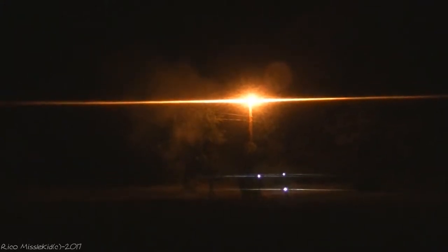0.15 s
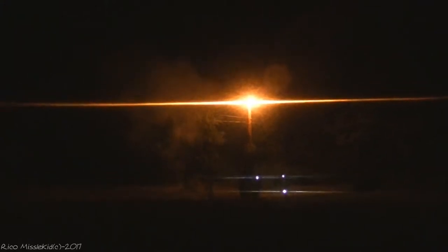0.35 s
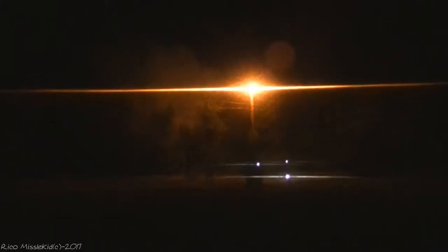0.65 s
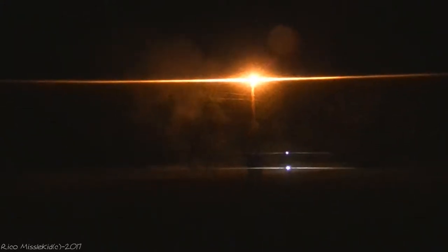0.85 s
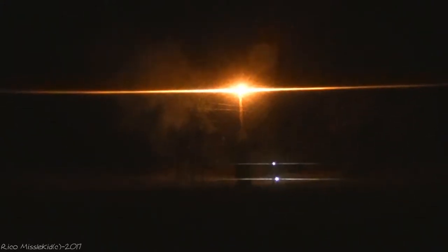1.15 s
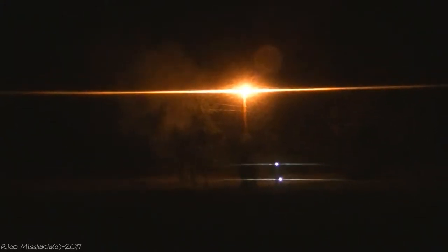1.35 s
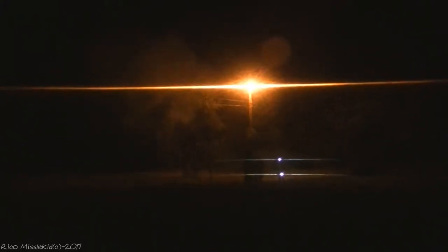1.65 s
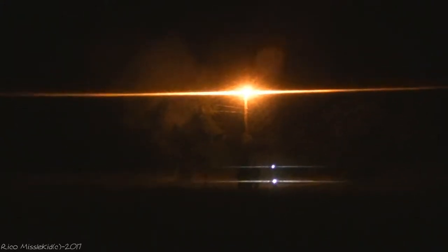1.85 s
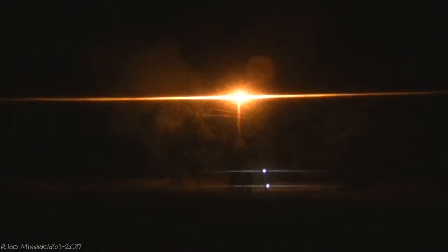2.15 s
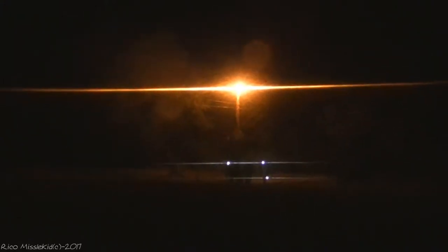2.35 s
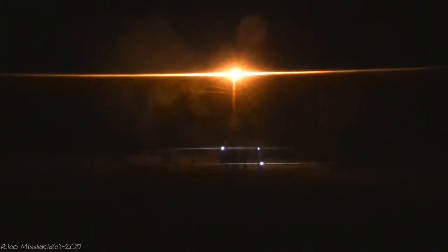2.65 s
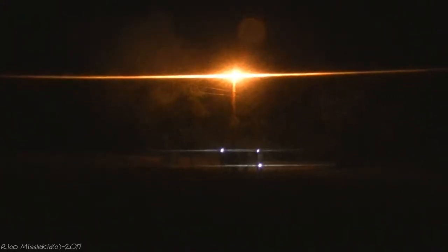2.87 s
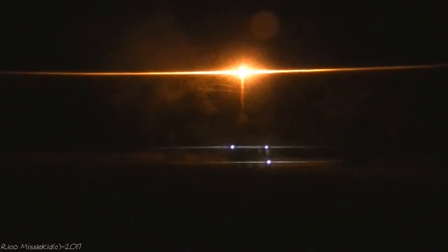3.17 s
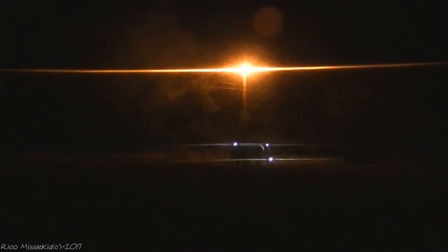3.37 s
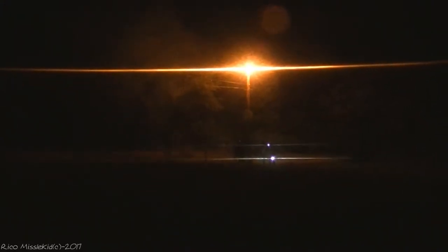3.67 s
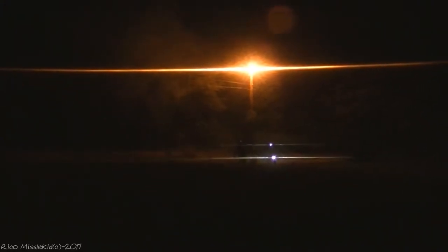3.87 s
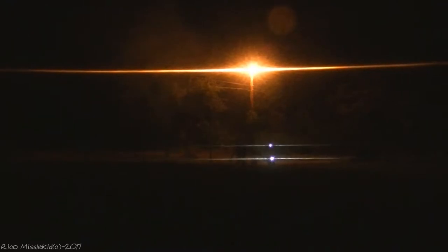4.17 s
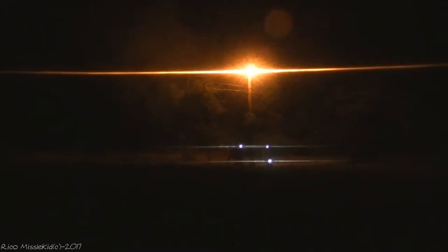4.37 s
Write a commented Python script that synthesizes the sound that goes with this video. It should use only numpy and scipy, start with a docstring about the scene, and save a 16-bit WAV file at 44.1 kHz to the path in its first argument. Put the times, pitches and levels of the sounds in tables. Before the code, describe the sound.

A steady wall of katydids and crickets in a dark open field, heard by a stationary stereo microphone. Short raspy strokes, about eight a second within each phrase, rise slightly from a midrange-to-high wash of distant insects. Pure cricket pulses never stop. Small dry clicks come near one and two seconds, a faint brief whistle later, and soft low murmur stays far below. Leaves and trunks add only slight diffuse echo.

```python
"""A field at night, full of insects. Near katydids rasp in phrases of up to three strokes: runs of tooth
catches ring a husky wing, mixed with a clearer, buzzing note. Many more blur into a wash of patchy noise from
the trees. Crickets trill without a break as pulsed pure tones, with a very faint fluttering whine above them.
Short whistles come from far off, a few dry puffs of noise tick close by, and filtered noise rumbles beneath."""
import sys
import numpy as np
from scipy import signal
from scipy.fft import rfft, irfft, next_fast_len
from scipy.io import wavfile
from scipy.ndimage import uniform_filter1d, map_coordinates

SR = 44100
rng = np.random.default_rng(int(sys.argv[2]) if len(sys.argv) > 2 else 0)


def output_pcm(signal):
    """Save a mono or channel-first signal as 16-bit PCM at the path in sys.argv[1].

    Samples are clipped to [-1, 1] before scaling.
    """
    pcm = np.clip(np.atleast_2d(signal).T, -1, 1) * 32767
    wavfile.write(sys.argv[1], SR, np.round(pcm).astype(np.int16))


N = 199053

# Phrases of the near katydids. Each row: middle of the first stroke in seconds, number of strokes,
# level in dB before stroke scatter, arch and voice trims, share of the clear ringing voice from 0 to 1.
KATYDID_PHRASES = [(.015, 2, -39.5, .35), (.395, 3, -39, .4), (.85, 2, -38.5, 0.14), (1.165, 3, -40, 0.18),
                   (1.648, 3, -37.5, 0.16), (1.96, 2, -46.5, 0.2), (2.382, 3, -40, 0.4),
                   (3.15, 3, -39, 0.66), (3.81, 1, -39, .5), (3.965, 3, -39, 0.9), (4.385, 2, -45, .2)]
# Wing resonances of the husky voice. Each row: pitch in Hz, half width in Hz, level in dB.
HUSKY_RESONANCES = [(4570, 160, 2.5), (4905, 140, -1.5), (5210, 99, -0.5), (5880, 98, -4)]
# Echo of the trees. Each row: frequency in Hz, time to decay by 60 dB in seconds.
TREE_ECHO = [(500, 0.1), (4000, 0.25), (10000, 0.072)]
# Kinds of trilling cricket. Each row: middle pitch in Hz, pitch spread in Hz per unit of place in the group,
# typical wing strokes per second, level in dB, lean to the left in dB.
CRICKET_KINDS = [(2159, 115, 42, -58, 1), (3035, 105, 42, -46, 2), (3879, 82, 45, -43.5, 1.5),
                 (7025, 125, 70, -50.5, -1)]
# Tone of the far tree line. Each row: frequency in Hz, relative level in dB.
FAR_SPECTRUM = [(1200, -32), (1650, -20), (1950, -3), (2200, -2), (2450, -0.5), (2800, 5), (3150, 6),
                (3500, 5), (4100, -29), (4600, -29), (5600, -35), (7500, -48), (9000, -80)]
# Tone of the nearer trees. Each row: frequency in Hz, relative level in dB.
TREES_SPECTRUM = [(2500, -44), (3700, -1), (4300, 1.5), (4800, 2.5), (5200, 1), (5800, -3.5), (6200, -12),
                  (6600, -8), (7000, -15), (7300, -17.5), (7650, -24.5), (9000, -57)]
# Tone of the high fizz. Each row: frequency in Hz, relative level in dB.
FIZZ_SPECTRUM = [(5000, -27), (7500, 1.5), (9200, 2.5), (11000, 1.5), (13000, -2), (15500, -9.5)]
# Brief lulls of the nearer trees: the middle of each in seconds.
LULL_TIMES = [1.51, 2.23, 3.205, 4.25]
# Course of the distant rumble. Each row: time in seconds, level in dB before an overall lift.
RUMBLE_LEVEL = [(0.1, -69.5), (0.17, -71.5), (1.57, -68), (1.94, -72.5), (2.43, -73), (2.47, -69.5),
                (2.74, -70.5), (4.07, -73.5), (4.45, -70)]
# Tone of the rumble. Each row: frequency in Hz, relative level in dB.
RUMBLE_SPECTRUM = [(20, -2.5), (60, -3.5), (130, -5.5), (190, -3), (255, -1), (350, -1.5), (500, -0.5),
                   (750, -1), (950, 0.5), (1200, -2.5), (1600, 3), (3000, -37), (6000, -66)]
# Tone of the low drone. Each row: frequency in Hz, relative level in dB.
DRONE_SPECTRUM = [(170, -26), (245, 1.5), (340, 0), (480, -5.5), (650, -33)]
# Faint far whistles. Each row: middle in seconds, pitch there in Hz, glide in Hz per second, level in dB.
FAR_CALLS = [(.09, 913, -100, -74), (1.519, 983, -700, -73), (3.13, 361, 247, -76), (3.46, 2365, 0, -50.5),
             (3.46, 2670, -3, -52), (3.44, 2140, -200, -57), (4.29, 880, -750, -72.5)]
# Dry ticks and soft rustles close by. Each row: middle in seconds, level in dB, pitch in Hz,
# half length in seconds.
CLOSE_TICKS = [(1.083, -42.5, 9300, .0012), (1.1925, -52, 8460, .001), (1.199, -50, 8340, .0012),
               (2.15, -60, 8800, 0.02), (2.1654, -32.5, 6800, 0.0017), (2.1658, -51, 9650, .0013),
               (2.188, -56, 8300, .015)]

STROKE_PERIOD_S, HALF_STROKE_S = 0.12, .027  # from one wing stroke to the next; half the length of one
STROKE_SCATTER_DB, ARCH_DB = 0.7, 2  # strokes differ at random; the outer strokes of a phrase are softer
FAR_DB, FAR_SWAY_DB = -44, 1.0  # the far tree line, and how much its level sways
TREES_DB, TREES_SWAY_DB = -39.5, 0.48  # the same for the nearer trees
SWAY_PER_S = 26  # random sway points per second: the mass drifts in and out of step
ANSWER_DB = 0.5  # the far ones join in with the strokes of the near ones
LULL_DB, HALF_LULL_S = 3.5, 0.028  # depth of the lulls and half their length
FIZZ_DB, FIZZ_SWAY_DB = -65.5, 0.37  # the faint high fizz of the chorus
DRONE_DB, DRONE_EXTRA_DB, DRONE_FADE_S = -74.5, 9.5, .9  # the drone starts louder and settles
TOP_HZ = 15750  # upper limit of the whole sound


def amp(db):
    """Decibels to gain."""
    return 10 ** (np.asarray(db) / 20)


def unit(x):
    """Scale to rms 1."""
    return x / np.sqrt(np.mean(x ** 2) + 1e-20)


def along(points, hz):
    """Read (Hz, value) points along a log frequency axis."""
    f, v = np.transpose(points)
    return np.interp(np.log(hz + 1), np.log(f + 1), v)


def clock():
    """The time of every sample in seconds."""
    return np.arange(N) / SR


def curve(rows):
    """Draw straight lines through (seconds, value) points, one value per sample."""
    s, value = np.transpose(rows)
    return np.interp(clock(), s, value)


def wobble(rate):
    """A smooth random curve with rate knots a second."""
    at = np.arange(0, N + 16, 16)  # every 16th sample is enough
    smooth = map_coordinates(rng.standard_normal(2500), [at * rate / SR], mode="mirror")
    return np.interp(np.arange(N), at, smooth)


def filtered(x, response):
    """Shape x by a complex response of frequency."""
    m = next_fast_len(N + SR // 2)
    spectrum = rfft(x, m) * response(np.fft.rfftfreq(m, 1 / SR))
    return irfft(spectrum, m)[..., :N]


def resonance(f, hz, width):
    """A causal resonance with steep skirts: two equal resonators in a row."""
    return (1j * f * width / (hz * hz - f * f + 1j * f * width)) ** 2


def pan(x, left_db):
    """Lean a sound to the left, or to the right if negative."""
    return x * amp([[left_db / 2], [-left_db / 2]])


def rush(spectrum, side_db, patchy_db):
    """Stereo noise of rms 1 that swells in short random patches of time and pitch."""
    z = signal.stft(rng.standard_normal((2, N)), nperseg=256)[2]
    patches = uniform_filter1d(rng.standard_normal(z.shape[1:]), 6, 0)
    patches = uniform_filter1d(patches, 18, 1)
    pair = signal.istft(z * amp(patchy_db * unit(patches)), nperseg=256)[1][:, :N]
    mid, side = filtered(pair, lambda hz: amp(along(spectrum, hz))) * amp([[0], [side_db]])
    return unit(np.array([mid + side, mid - side]))


def outdoors(x, wet_db, side_db):
    """Add the scatter from leaves and trunks, a noise tail whose decay depends on pitch, at about equal power."""
    hz, t, z = signal.stft(rng.standard_normal((2, SR // 2)), SR, nperseg=256)
    decay = amp(-60 * t / along(TREE_ECHO, hz)[:, None])
    tail = signal.istft(z * decay, SR, nperseg=256)[1]
    scatter = signal.fftconvolve(x[None], tail / np.linalg.norm(tail[0]), axes=1)[:, :N]
    mid, side = scatter * amp([[wet_db], [wet_db + side_db]])
    return np.array([x + mid + side, x + mid - side]) / np.sqrt(1 + amp(2 * wet_db))


def phrasing():
    """Power of the husky and the clear voice: evenly spaced wing strokes that swell and fade."""
    t, power = clock(), np.zeros((2, N))
    for s, strokes, db, clear in KATYDID_PHRASES:
        scatter_db = STROKE_SCATTER_DB * rng.standard_normal(size=8)
        share = np.clip(clear, 0, 1)
        for k in range(round(strokes)):
            swell = np.exp(-np.abs((t - s - k * STROKE_PERIOD_S) / HALF_STROKE_S) ** 3)
            arch_db = ARCH_DB * (k - (round(strokes) - 1) / 2) ** 2
            stroke_power = amp(db + scatter_db[k] - arch_db) ** 2 * swell
            power += np.outer([1 - share, share], stroke_power)
    return power


def scrape(wing, tooth_rate, scatter, size_db):
    """The scraper catches the teeth of the file one by one; each catch rings the wing."""
    chance = rng.standard_normal((4000, 2))
    gaps = np.exp(scatter * chance[:, 0])
    at = np.round(np.cumsum(gaps) * SR / tooth_rate).astype(int)
    catches = np.bincount(at[at < N], amp(size_db * chance[at < N, 1]), N)

    def ring(f):
        # neighbouring resonances take opposite signs
        return sum((-1) ** k * amp(db) * resonance(f, hz, 2 * half_width)
                   for k, (hz, half_width, db) in enumerate(wing))
    return unit(filtered(catches, ring))


def ringing_wing(hz=5275, tooth_rate=215, depth=0.53, waver=0.011):
    """A sharply tuned wing keeps ringing from tooth to tooth: a buzzing, nearly pure note."""
    teeth = np.cumsum(tooth_rate * (1 + 0.1585 * wobble(60))) / SR
    pitch = hz * (1 + waver * wobble(35) + waver * wobble(400))
    buzz = (1 + depth * np.cos(2 * np.pi * teeth)) * amp(1.0 * wobble(140))
    return unit(buzz * np.sin(2 * np.pi * np.cumsum(pitch) / SR))


def katydids(power, husky_db=-0.1, clear_db=-1.0):
    """Each wing stroke swells and fades, mixing husky tooth catches with the clear ringing wing."""
    rasp = scrape(HUSKY_RESONANCES, tooth_rate=400, scatter=.25, size_db=1.0)
    husky = amp(husky_db) * np.sqrt(power[0]) * rasp
    ringing = amp(clear_db) * np.sqrt(power[1]) * ringing_wing()
    return pan(outdoors(husky + ringing, wet_db=-14, side_db=-6), left_db=.4)


def trill(hz, stroke_rate, sag=.03, drift=.011, swell_db=1.0):
    """One cricket: a pure pulse for every closing of the wings, its pitch sagging as they slow."""
    strokes = rng.random() + np.cumsum(stroke_rate * (1 + .06 * wobble(8))) / SR
    cycle = strokes % 1
    # the wings sound for 68 % of each cycle
    pulse = np.sin(np.pi * np.clip(cycle / 0.68, 0, 1))
    pitch = hz * (1 - sag * (cycle - .3) + drift * wobble(70))
    # the wing starts ringing afresh with every stroke
    start = rng.random(2000)[strokes.astype(int)]
    tone = np.sin(2 * np.pi * (start + np.cumsum(pitch) / SR))
    return pulse * amp(swell_db * wobble(10)) * tone


def crickets(count=12):
    """Several animals of each kind trill out of step, on slightly different notes."""
    out = np.zeros((2, N))
    for hz, spread_hz, rate, db, left_db in CRICKET_KINDS:
        group = np.zeros(N)
        for place in np.linspace(-1.4, 1.4, count):
            own_rate = rate * np.exp(.2 * rng.standard_normal())
            # the outer notes of the group are softer
            group += amp(-2 * place ** 2) * trill(hz + spread_hz * place, own_rate)
        heard = outdoors(group, wet_db=-12, side_db=-1)
        out += amp(db) * pan(unit(heard), left_db)
    return out


def thin_trill(hz=7867, flutter_per_s=30, level_db=-79):
    """A very faint, high whine: a slightly wavering sine that flutters in level."""
    t = clock()
    flutter = np.sin(np.pi * flutter_per_s * t)  # two swells in each full cycle
    return amp(level_db) * unit(flutter * np.sin(2 * np.pi * hz * t + .5 * wobble(5)))


def chorus(power, follow=0.43):
    """Countless distant rasps run together as noise; the farther the trees, the duller their sound."""
    lull_db = LULL_DB * sum(np.exp(-((clock() - s) / HALF_LULL_S) ** 2) for s in LULL_TIMES)
    near = unit(np.sqrt(power.sum(0)))
    swell_db = ANSWER_DB * (near - near.mean()) + FAR_SWAY_DB * wobble(SWAY_PER_S)
    tree_line = amp(FAR_DB + swell_db) * rush(FAR_SPECTRUM, side_db=-9.5, patchy_db=0.58)
    # the nearer trees and the fizz swell a little with the mass of the chorus
    trees_db = TREES_DB + TREES_SWAY_DB * wobble(SWAY_PER_S) + follow * swell_db - lull_db
    nearer = amp(trees_db) * rush(TREES_SPECTRUM, side_db=-16, patchy_db=0.65)
    fizz_db = FIZZ_DB + FIZZ_SWAY_DB * wobble(3.57) + follow * swell_db
    fizz = amp(fizz_db) * rush(FIZZ_SPECTRUM, side_db=-20.5, patchy_db=1.1)
    return pan(tree_line, left_db=1.5) + pan(nearer, left_db=0.7) + fizz


def rumble(lift_db=4):
    """The low murmur of the far surroundings arrives from all sides as wide noise, with a settling drone."""
    murmur = amp(curve(RUMBLE_LEVEL) + lift_db) * rush(RUMBLE_SPECTRUM, side_db=-.5, patchy_db=1.36)
    drone_db = DRONE_DB + DRONE_EXTRA_DB * np.exp(-clock() / DRONE_FADE_S)
    drone = amp(drone_db) * rush(DRONE_SPECTRUM, side_db=4.5, patchy_db=1.0)
    return murmur + drone


def far_calls(half_length_s=0.039):
    """Short whistles, level or gliding, each a slightly unsteady sine blurred by distance."""
    out = np.zeros(N)
    for s, hz, glide, db in FAR_CALLS:
        t = clock() - s
        swell = np.exp(-(t / half_length_s) ** 2)
        whistle = np.sin(2 * np.pi * (hz + glide * t / 2) * t + .3 * wobble(83))
        out += amp(db) * swell * np.sqrt(2) * whistle
    return pan(outdoors(out, wet_db=-13, side_db=0), left_db=1.5)


def ticks(width_hz=2000):
    """Tiny dry snaps and rustles, each a puff of noise around its own pitch."""
    out = np.zeros(N)
    for s, db, hz, half in CLOSE_TICKS:
        hiss = filtered(rng.standard_normal(N), lambda f: resonance(f, hz, width_hz))
        swell = np.exp(-((clock() - s) / half) ** 2)
        out += amp(db) * np.std(swell) * unit(swell * hiss)
    return out


def scene():
    """All the voices of the field."""
    power = phrasing()
    insects = katydids(power) + crickets() + thin_trill() + chorus(power)
    return insects + rumble() + far_calls() + ticks()


def record(dry):
    """Keep only what lies below the band limit."""
    return filtered(dry, lambda hz: hz < TOP_HZ)


dry = scene()
out = record(dry)
output_pcm(out)
```